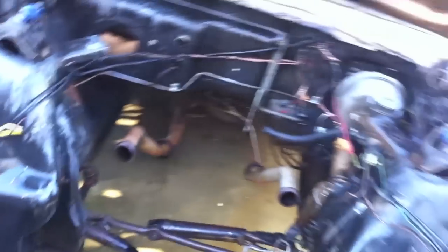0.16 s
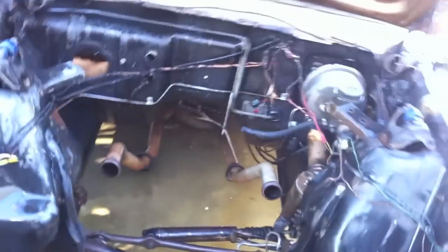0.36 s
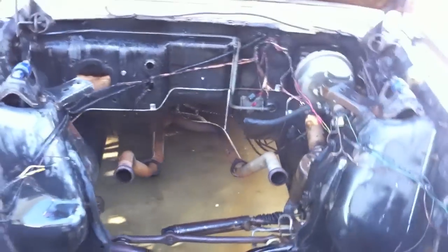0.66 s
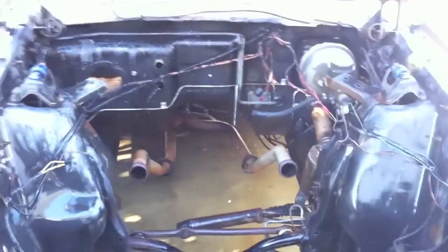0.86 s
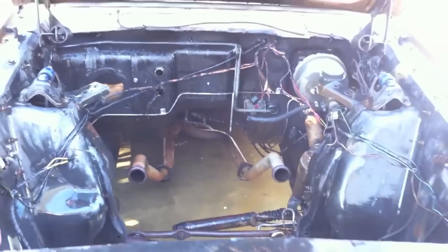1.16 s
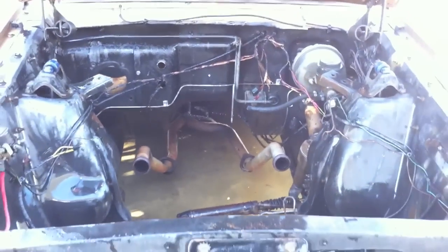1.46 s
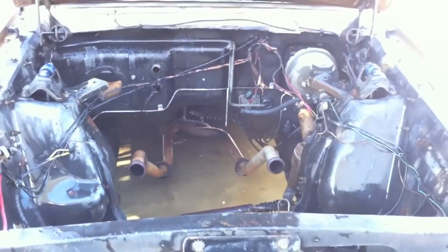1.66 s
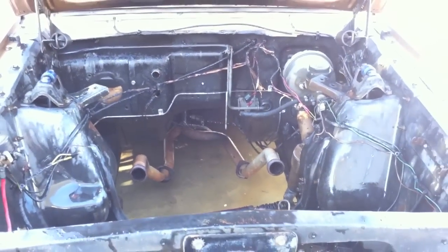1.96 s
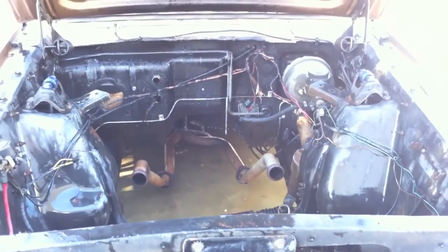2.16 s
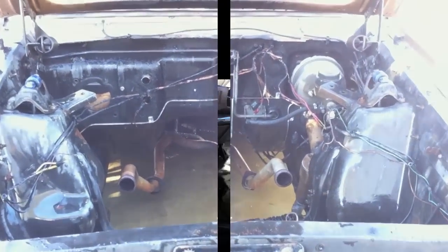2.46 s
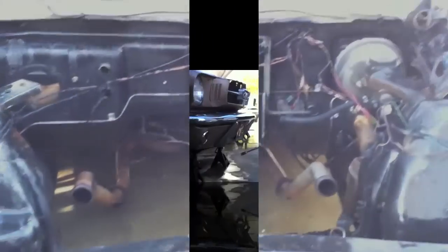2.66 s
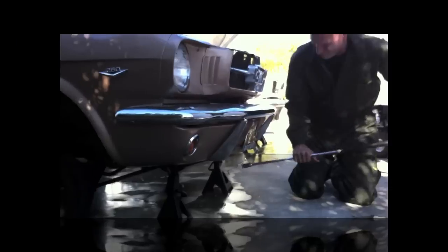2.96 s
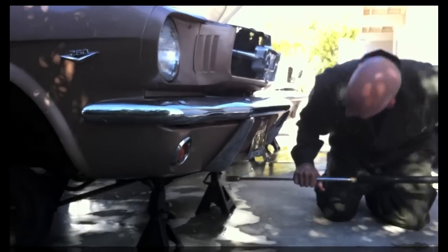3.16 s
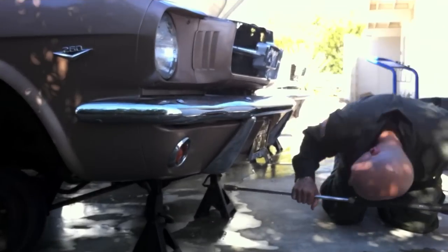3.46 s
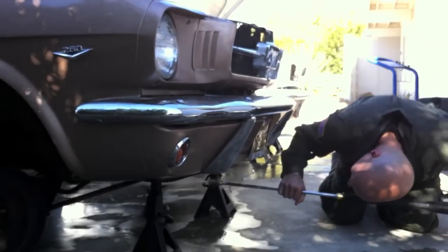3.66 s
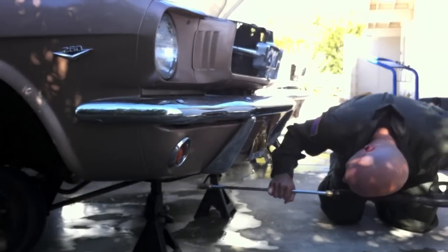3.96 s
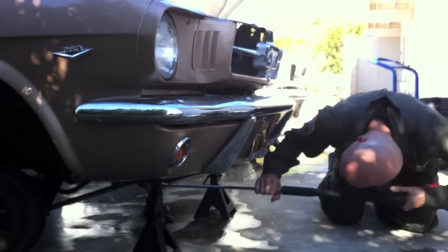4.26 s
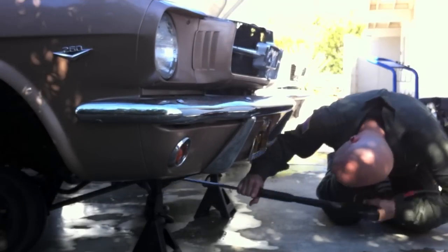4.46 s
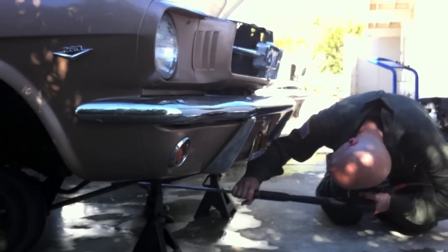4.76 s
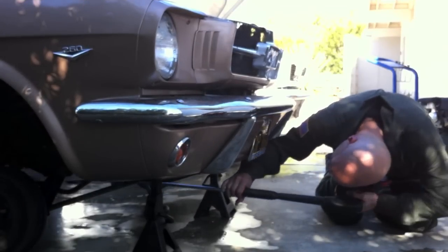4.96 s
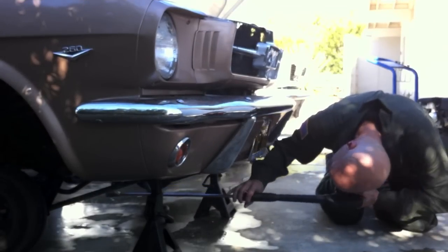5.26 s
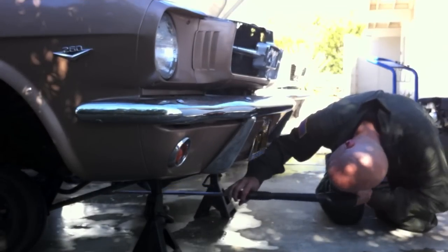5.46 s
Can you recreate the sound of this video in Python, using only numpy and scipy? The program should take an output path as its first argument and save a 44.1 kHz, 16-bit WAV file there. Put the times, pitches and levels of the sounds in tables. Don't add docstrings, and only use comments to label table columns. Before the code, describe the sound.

Soft outdoor hum and clinks on wet metal crossfade into a chugging small engine, then two hissing water-jet bursts drum on a car floor.

```python
import sys
import numpy as np
from scipy import signal
from scipy.fft import rfft, irfft
from scipy.io import wavfile

SR = 44100
rng = np.random.default_rng(int(sys.argv[2]) if len(sys.argv) > 2 else 0)


def output_pcm(signal):
    pcm = np.clip(np.atleast_2d(signal).T, -1, 1) * 32767
    wavfile.write(sys.argv[1], SR, np.round(pcm).astype(np.int16))


def level_to_linear(level):
    exponent = np.asarray(level, float) / 20
    return 10 ** exponent


N = 247842

FADE_AT_S, FADE_S = 2.371, 0.93
LOAD_LAG_S = 0.097

# (opens [s], slackens [s], first burst [dB])
PULLS = [
    (3.797, 4.331, 9.5),
    (4.547, 6.0, 7),
]


def seconds():
    return np.arange(N) / SR


def rms_one(x):
    return x / np.sqrt(np.mean(x ** 2) + 1e-20)


def in_time(rows):
    s, *columns = np.transpose(rows)
    return [np.interp(seconds(), s, column) for column in columns]


def drift(rate_hz):
    r = np.exp(-80 * np.pi * rate_hz / SR)
    slow = signal.lfilter([1], [1, -2 * r, r * r], rng.standard_normal(N // 40 + 2002))
    slow = slow[2000:]
    return np.interp(np.arange(N) / 40, np.arange(len(slow)), rms_one(slow))


def resonance(x, hz, width_hz):
    r = np.exp(-np.pi * width_hz / SR)
    feedback = [1, -2 * r * np.cos(2 * np.pi * hz / SR), r * r]
    return signal.lfilter(np.array([1, 0, -1]) * (1 - r * r) / 2, feedback, x)


def band(low_hz, high_hz):
    sos = signal.butter(2, [low_hz, high_hz], "band", fs=SR, output="sos")
    return rms_one(signal.sosfilt(sos, rng.standard_normal(N)))


def coloured(spectrum, patchy_db):
    hz, db = np.transpose(spectrum)
    edges_hz = 35 * 2 ** np.arange(0, 9.1, .5)
    together = drift(4.0)
    white = rng.standard_normal((2, N))
    out = 0
    for k, (low, high) in enumerate(zip(edges_hz, edges_hz[1:])):
        level_db = np.interp(np.log(low * high) / 2, np.log(hz), db)
        sos = signal.butter(2, [low, high], "band", fs=SR, output="sos")
        noise = signal.sosfilt(sos, white[k % 2])
        out = out + level_to_linear(level_db + patchy_db * (1.7 * together + drift(19.0))) * noise
    return rms_one(out)


def bumps(rows):
    return sum(level_to_linear(db) * np.exp(-((seconds() - s) / half_s) ** 2) for s, db, half_s in rows)


def fade_in():
    return np.clip((seconds() - FADE_AT_S) / FADE_S, 0, 1)


def yard():
    # (time [s], pitch [Hz], level [dB])
    far_drone = [
        (0.0, 136, -49),
        (0.05, 134.4, -46),
        (0.26, 135, -50.5),
        (0.36, 138.2, -48),
        (1.12, 143.3, -52),
        (2.06, 143, -61),
        (2.4, 147, -55),
    ]
    # (frequency [Hz], density [dB per Hz])
    air_spectrum = [(24, -66), (40, -40), (115, -14), (147, -3), (269, -13), (433, -21), (646, -17.5),
                    (790, -21), (1760, -31.5), (9220, -37), (16000, -39)]
    hz, drone_db = in_time(far_drone)
    phase = 2 * np.pi * np.cumsum(hz + 0.4 * drift(11.0)) / SR
    drone = np.sqrt(2) * np.sin(phase) * level_to_linear(drone_db + 2.8 * drift(2.3))
    air_db, calms_db_per_s = -54.5, 0.85
    air = level_to_linear(air_db - calms_db_per_s * seconds()) * coloured(air_spectrum, patchy_db=0.65)
    return (1 - fade_in()) * (drone + air)


def scuffs():
    # (time [s], level [dB], half length [s])
    brushes = [
        (0.1, -63, 0.02),
        (0.25, -61, 0.018),
        (0.765, -61, 0.032),
        (0.95, -65, 0.03),
    ]
    return bumps(brushes) * band(1500, 15000)


def ticks():
    # (time [s], peak level [dB], pitch [Hz], decay by 60 dB [s])
    knocks = [
        (0.097, -35.5, 1580, 0.05),
        (0.246, -40, 1730, 0.056),
        (0.482, -34, 1700, 0.04),
        (0.7468, -41, 1150, 0.05),
        (0.7744, -53, 6000, 0.05),
        (0.83, -43, 1960, 0.09),
        (1.0161, -45, 3550, 0.05),
        (1.2976, -41, 5200, 0.03),
        (1.2985, -42, 2200, 0.03),
    ]
    out, t = np.zeros(N), np.arange(SR // 5) / SR
    noises = rng.standard_normal((len(knocks), len(t)))
    for (s, db, hz, t60_s), noise in zip(knocks, noises):
        burst = np.diff(noise, prepend=0) * 0.13 + resonance(noise, hz, 0.31 * hz + 50) * 2.0
        out[round(s * SR):][:len(t)] += level_to_linear(db - 8 - 60 * t / np.clip(t60_s, .01, .3)) * burst
    return out


def chatter():
    # (time [s], level [dB], rise [s], pitch rung most [Hz])
    rattles = [
        (0.875, -57.5, 0.019, 3800),
        (0.935, -60.5, 0.01, 3500),
        (1.02, -70, 0.022, 3200),
        (1.1, -74, 0.05, 2800),
        (1.19, -67, 0.03, 3500),
        (1.23, -74, 0.021, 3300),
    ]
    # (frequency [Hz], width [Hz], level [dB])
    part_modes = [(1820, 60, -3), (2780, 73, 3), (3080, 22, -2), (3260, 31, -1), (3460, 50, 0),
                  (3740, 26, 0), (5020, 30, 1), (5720, 50, -2)]
    dies_db_per_s, scrape_db, off_pitch_db_per_oct2 = 145, 0.5, 9
    contacts_per_s = 1500
    clicks = (rng.random(N) < contacts_per_s / SR) * rng.standard_normal(N) + 1e-18
    modes = np.array([level_to_linear(db) * rms_one(resonance(clicks, hz, width_hz)) for hz, width_hz, db in part_modes])
    scrape = rms_one(resonance(resonance(clicks, 1700, 2100), 1700, 2700))
    out, t = 0, seconds()
    for s, db, rise_s, hz in rattles:
        octaves_off = np.log2(np.array(part_modes)[:, 0] / hz)
        share = level_to_linear(-off_pitch_db_per_oct2 * octaves_off ** 2)
        rise = np.clip(1 + (t - s) / rise_s, 0, 1)
        knock = rise * level_to_linear(db - dies_db_per_s * np.maximum(t - s, 0))
        out = out + knock * (rms_one(share @ modes) + level_to_linear(scrape_db) * scrape)
    return out


def thumps():
    # (time [s], peak level [dB], pitch [Hz])
    jolts = [
        (3.79, -52, 40),
        (4.11, -38, 70),
        (4.39, -50, 40),
        (4.53, -42, 40),
        (5.11, -44, 45.03),
    ]
    out, t = np.zeros(N), np.arange(SR // 8) / SR
    for s, db, hz in jolts:
        out[round(s * SR):][:len(t)] += level_to_linear(db) * np.sin(2 * np.pi * hz * t) * np.exp(-t / 0.021)
    return out


def settle(start_s):
    governor_hz, settles_s = 3.0, 0.125
    t, w = np.maximum(seconds() - start_s, 0), 2 * np.pi * governor_hz
    return 1 - np.exp(-t / settles_s) * (np.cos(w * t) + np.sin(w * t) / (w * settles_s))


def pump_load():
    unload_lag_s = 0.058
    return sum(settle(opens + LOAD_LAG_S) - settle(slackens + unload_lag_s) for opens, slackens, _ in PULLS)


def surge():
    surge_s = 0.13
    since = [np.maximum(seconds() - opens - LOAD_LAG_S, 0) / surge_s for opens, _, _ in PULLS]
    return sum(x * x * np.exp(2 - 2 * x) for x in since)


def firing_cycle(load):
    free_hz, sag_hz, first_firing = 30.16, 2.13, .35
    return first_firing + np.cumsum(free_hz - sag_hz * load) / SR - free_hz * FADE_AT_S


def puff(cycle, at, sharp):
    return 2 * np.exp(sharp * (np.cos(2 * np.pi * (cycle - at)) - 1)) - 1


def causal_orders(orders):
    gain = level_to_linear(np.array(orders)[:, 1])
    log_gain = np.log(np.r_[gain[0], gain, np.full(12, gain[-1] / 8)])
    cepstrum = irfft(log_gain)
    cepstrum[1:len(log_gain) - 1] *= 2
    cepstrum[len(log_gain):] = 0
    return np.exp(rfft(cepstrum))[1:len(gain) + 1] / np.sqrt(np.sum(gain ** 2) / 2)


def engine(cycle, load):
    # (multiple of firing rate [1], level [dB])
    free_orders = [(1, -57), (2, -37), (3, -53.5), (4, -21), (5, -6), (6, 3.5), (7, -6.5), (8, -4.5),
                   (9, 0.5), (10, -0.5), (11, -20), (12, -11), (13, -9), (14, -24.5), (15, -7), (16, -11.5),
                   (17, -10.5), (18, -13), (19, -9), (20, -14), (21, -34.5), (22, -7.5), (23, -31),
                   (24, -25), (25, -72), (26, -19), (27, -34), (28, -8.5), (29, -33), (30, -7), (31, -19.5),
                   (32, -9), (33, -20.5), (34, -23), (35, -11.5), (36, -48)]
    # (multiple of firing rate [1], level [dB])
    loaded_orders = [(1, -52), (2, -44), (3, -36.5), (4, -21), (5, -8.5), (6, -2.5), (7, -2), (8, -26.5),
                     (9, -4), (10, 1.5), (11, -10), (12, -1.5), (13, -30.5), (14, -35), (15, -10),
                     (16, -6.5), (17, -13), (18, 5.5), (19, -9.5), (20, -35), (21, -5.5), (22, -21),
                     (23, -36), (24, -30), (25, -8), (26, -14.5), (27, -33), (28, -11.5), (29, -8.5),
                     (30, -13), (31, -17.5), (32, -7.5), (33, -19.5), (34, -1.5), (35, -9.5), (36, -21)]
    # (frequency [Hz], density [dB per Hz])
    casing_spectrum = [(24, -76), (40, -66), (96, -49), (180, -8.5), (226, -13), (290, 12), (345, -18),
                       (455, -12.5), (751, -10), (918, -12.5), (1090, -11.5), (10400, -25), (16000, -31.5)]
    exhaust_db, casing_db, casing_loaded_db, surge_whine_db = -19.5, -24.0, 2.5, 2
    load = np.clip(1.47 * load - 0.2, 0, 1)
    whine = level_to_linear(0.84 + surge_whine_db * surge())
    wobble = cycle + 0.0023 * drift(6.6)
    tone = np.zeros(N)
    pairs = zip(causal_orders(free_orders), causal_orders(loaded_orders))
    for multiple, (free, loaded) in enumerate(pairs, 1):
        height = np.sqrt(1 - load) * free + np.sqrt(load) * loaded * whine
        height = height * level_to_linear((0.43 + 1.33 * load) * drift(5.0))
        tone += np.real(height * np.exp(2j * np.pi * multiple * wobble))
    casing = coloured(casing_spectrum, patchy_db=0.36) * level_to_linear(2.38 * puff(cycle, 0.24, sharp=4.4))
    boom = signal.sosfilt(signal.butter(2, 450, fs=SR, output="sos"), casing)
    boom_db = (4.5 + 1.6 * load) * puff(cycle, 0.33 - 0.15 * load, sharp=2.7)
    casing = casing + boom * (level_to_linear(boom_db) - 1)
    return level_to_linear(exhaust_db) * tone + level_to_linear(casing_db + casing_loaded_db * load) * casing


def jet_hiss(load):
    jet_db, pressure_db, burst_s = -23.0, 6.5, 0.086
    slack_drop_db, slack_dies_db_per_s, surge_hiss_db = 10.5, 42, 1
    t, hiss, slack = seconds(), np.zeros(N), np.zeros(N)
    for opens, slackens, burst_db in PULLS:
        burst = burst_db * np.exp(-np.maximum(t - opens, 0) / burst_s)
        held_db = jet_db + pressure_db * (np.minimum(load, 1) - 1) + surge_hiss_db * surge() + burst
        dying_db = jet_db - slack_drop_db - slack_dies_db_per_s * (t - slackens)
        hiss = np.where(t < opens, hiss, level_to_linear(np.where(t < slackens, held_db, dying_db)))
        slack = np.where(t < opens, slack, t > slackens)
    return hiss, slack


def jet(cycle, load):
    # (frequency [Hz], density [dB per Hz])
    spray_spectrum = [(880, -40.5), (1500, 8), (1960, -15), (2120, -5), (3380, -10), (4830, -3), (7030, -3),
                      (14100, 1.5), (16000, -6)]
    # (time [s], level [dB])
    pan_hits = [
        (3.8, -33.5),
        (4.052, -23),
        (4.524, -42.5),
        (4.888, -21.5),
        (5.036, -25),
        (5.082, -20.5),
        (5.168, -27),
        (5.608, -29),
        (5.62, -16),
    ]
    # (frequency [Hz], width [Hz], level [dB])
    pan_rings = [(1033, 34, -12.5), (1379, 38, -6.5), (1700, 31, -13), (2064, 230, -23.5)]
    # (time [s], level [dB], half length [s])
    edge_splashes = [
        (3.875, -32, 0.064),
        (4.396, -36, 0.039),
        (5.123, -22, 0.076),
    ]
    throb_db, sputter_db = 1.5, 11.5
    hiss, slack = jet_hiss(load)
    sputter = slack * np.clip(3.3 * load + 0.64, 0, 1) * puff(cycle, 0.32, sharp=1.6)
    strokes_db = throb_db * puff(cycle, 0.23, sharp=0.41) + sputter_db * sputter
    strokes_db = strokes_db + 0.5 * np.cos(4 * np.pi * (cycle - .1))
    spray = hiss * level_to_linear(2.5) * coloured(spray_spectrum, patchy_db=0.66)
    rings = sum(level_to_linear(db) * rms_one(resonance(rng.standard_normal(N), hz, width_hz))
                for hz, width_hz, db in pan_rings)
    drumming = level_to_linear(-2.5) * band(720, 3400) + level_to_linear(-3.0) * band(250, 870) + rings
    pan = (hiss > 0) * level_to_linear(in_time(pan_hits)[0]) * drumming
    splash = bumps(edge_splashes) * band(4100, 6500)
    return level_to_linear(strokes_db) * (spray + pan + splash)


def scene():
    load = pump_load()
    cycle = firing_cycle(load)
    background = yard() + scuffs() + ticks() + chatter()
    washer = thumps() + fade_in() * engine(cycle, load) + jet(cycle, load)
    mono = background + washer
    return np.array([mono, mono])


def low_pass(x):
    return signal.sosfilt(signal.butter(12, 16430, fs=SR, output="sos"), x)


def record(dry):
    rounded = 0.94 * np.tanh(dry / 0.96)
    cutoff_hz = 15750
    cut = signal.sosfilt(signal.ellip(12, .5, 45, cutoff_hz, fs=SR, output="sos"), rounded)
    return low_pass(cut)


dry = scene()
out = record(dry)
output_pcm(out)
```